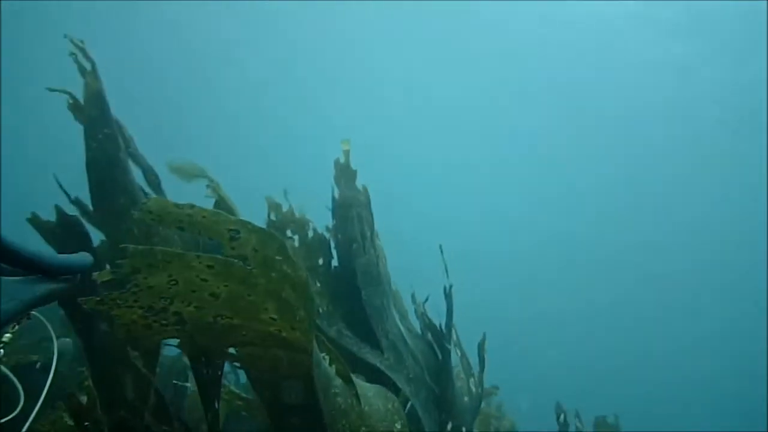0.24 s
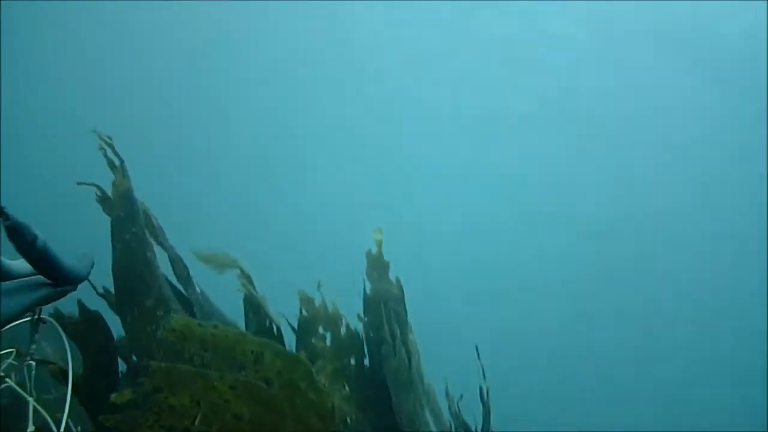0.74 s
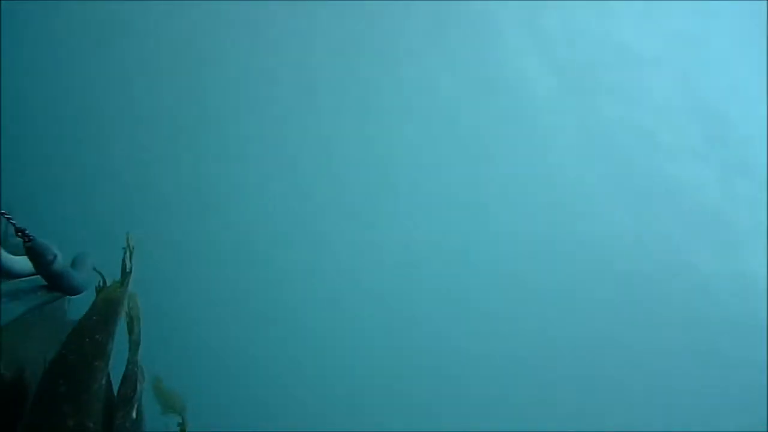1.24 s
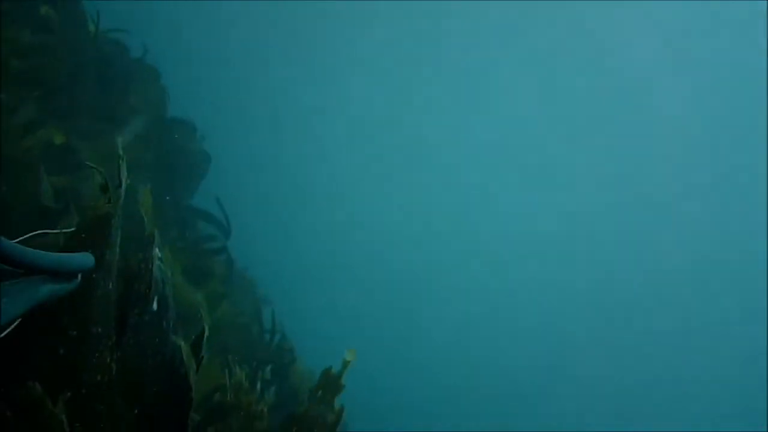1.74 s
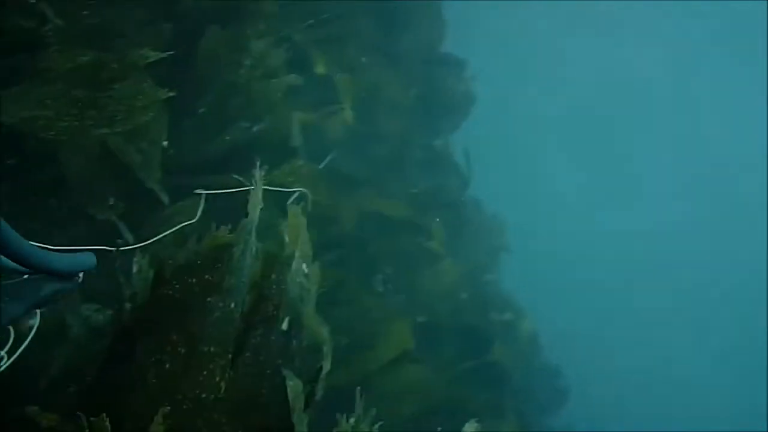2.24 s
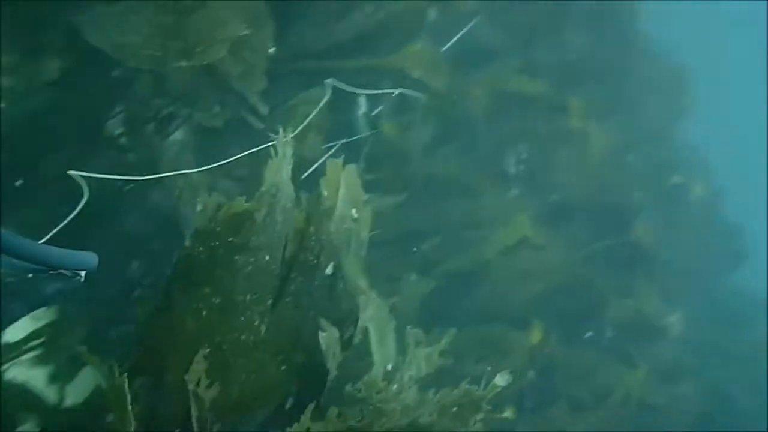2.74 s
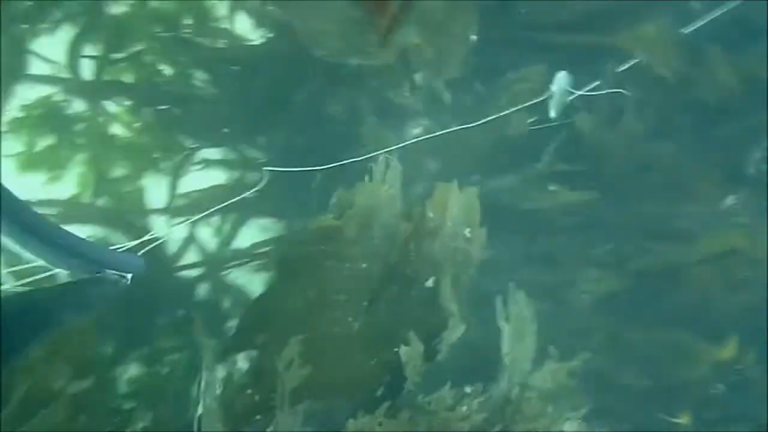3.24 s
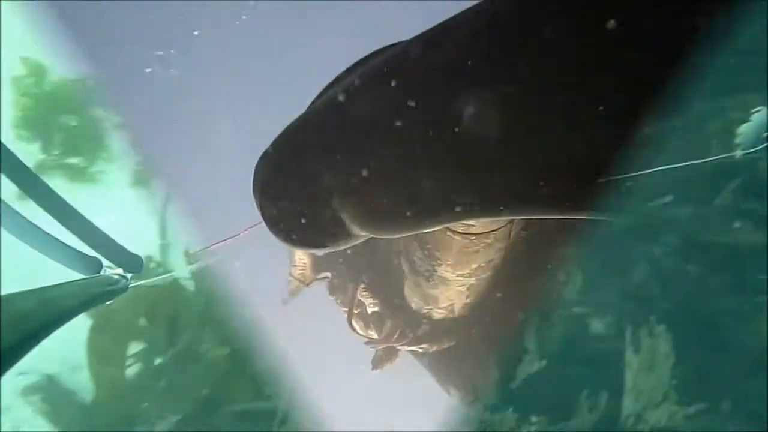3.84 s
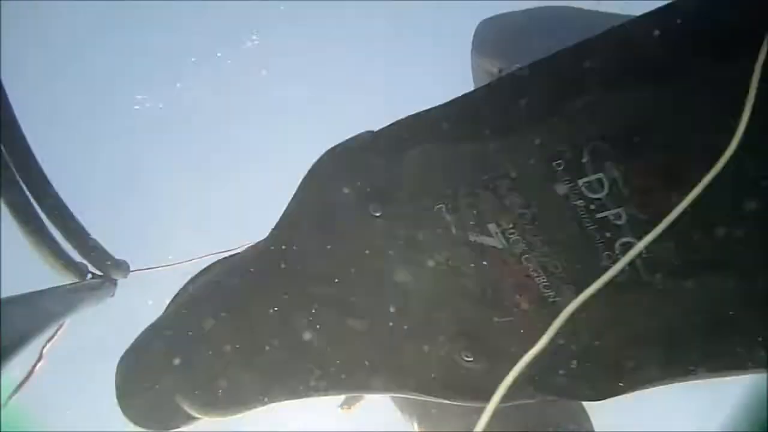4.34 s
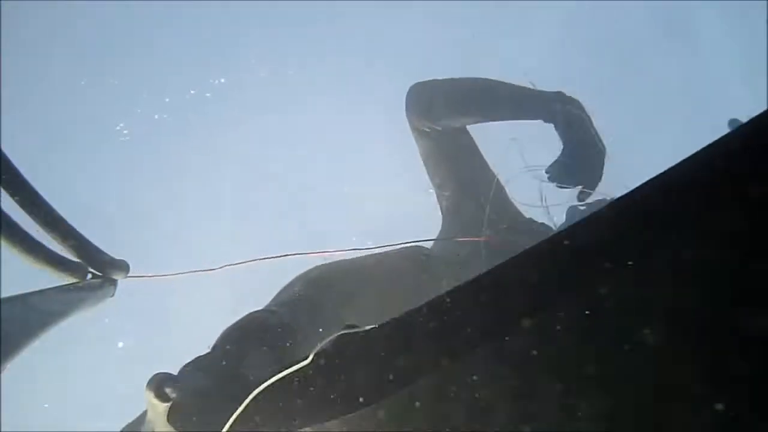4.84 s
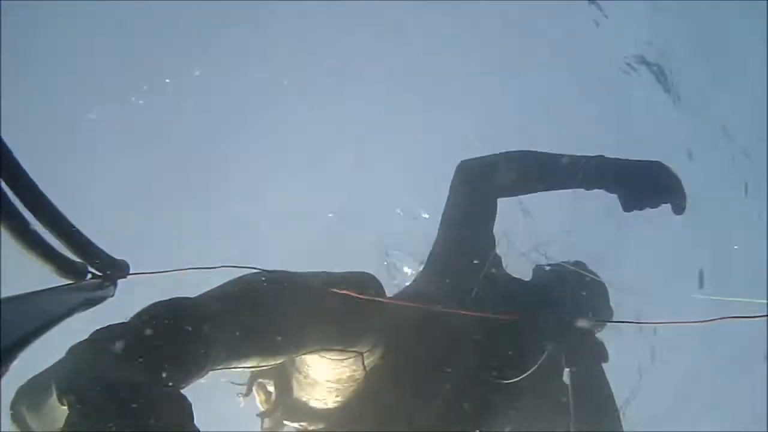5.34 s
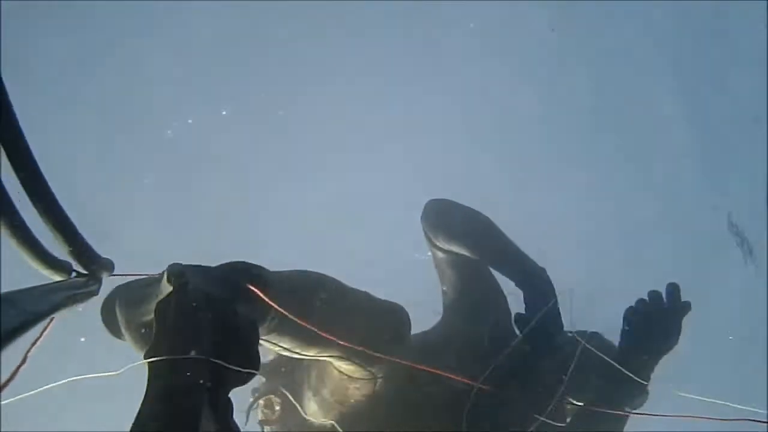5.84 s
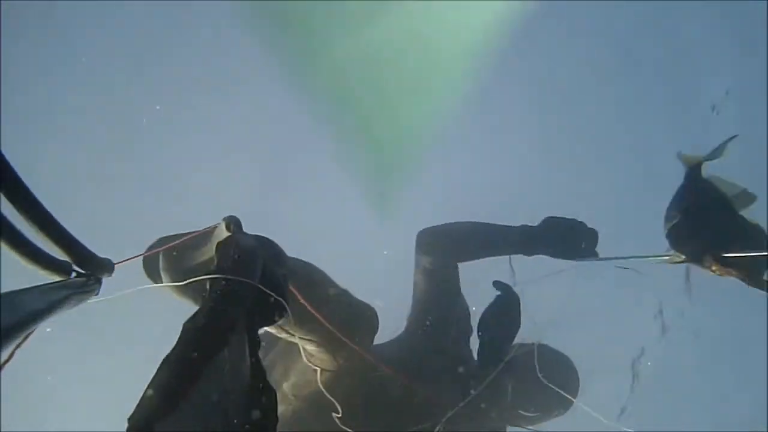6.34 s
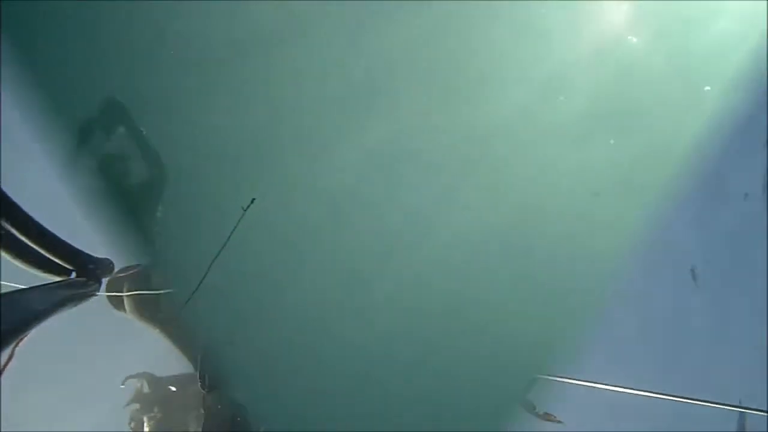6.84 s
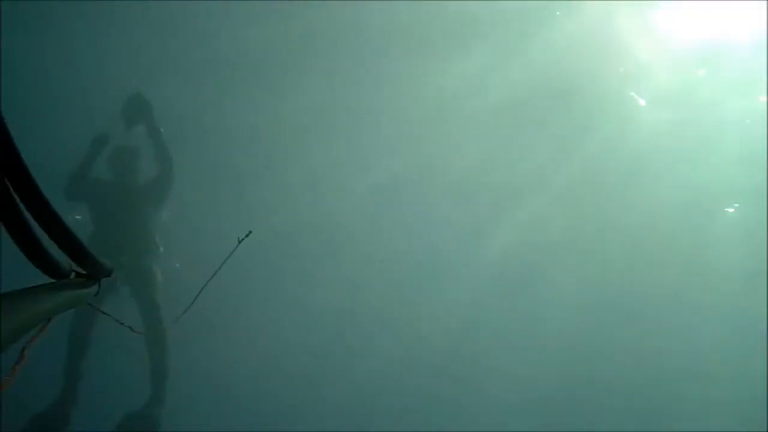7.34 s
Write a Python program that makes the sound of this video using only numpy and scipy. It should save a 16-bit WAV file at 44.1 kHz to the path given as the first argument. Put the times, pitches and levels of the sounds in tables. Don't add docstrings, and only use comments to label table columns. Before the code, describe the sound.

Hard gear bumps and snaps dully against a barrel underwater, heard close through a sealed case, over constant hiss, with faint taps and a dragging cord.

```python
import sys
import numpy as np
from scipy import signal
from scipy.fft import rfft, irfft
from scipy.io import wavfile
from scipy.ndimage import uniform_filter1d

SR = 44100
rng = np.random.default_rng(int(sys.argv[2]) if len(sys.argv) > 2 else 0)


def digitize_waveform(pressure):
    field = np.atleast_2d(pressure).T
    bounded = np.clip(field, -1, 1)
    quanta = np.round(bounded * 32767).astype(np.int16)
    wavfile.write(sys.argv[1], SR, quanta)


def invert_db(level):
    return 10 ** (np.asarray(level, dtype=float) / 20)


N = 334233
LAG = 44

# (frequency [Hz], level [dB], t60 [s])
TAP_MODES = [
    [(161, 0, 0.033)],
    [(243.8, 0, 0.12)],
    [(430, -0.5, 0.037), (574, -0.74, 0.069)],
    [(1036, 1.5, 0.031), (1410, 5, 0.0067)],
]


def evened(x):
    return x / np.sqrt(np.mean(x ** 2) + 1e-20)


def along(rows):
    s, value = np.transpose(rows)
    return np.interp(np.arange(N) / SR, s, value)


def gate(start_s, end_s):
    t = np.arange(N) / SR
    return (t > start_s) & (t < end_s)


def add(mix, at, sound):
    part = mix[at:][:len(sound)]
    part += sound[:len(part)]


def ring(modes, rise_turns=0.43):
    t = np.arange(SR // 2) / SR
    x = np.zeros(len(t))
    for k, (hz, db, t60) in enumerate(modes):
        swell = 1 - np.exp(-t * hz / rise_turns)
        x += (-1) ** k * invert_db(db - 60 * t / t60) * np.sin(2 * np.pi * hz * t) * swell
    return x / abs(x).max()


def knocks(rows, modes, trim_db, rise_turns):
    shapes = np.array([ring(part, rise_turns) for part in modes])
    out = np.zeros(N)
    for s, blow_db, barrel_db, mount_db in rows:
        part_db = blow_db + np.add([0, barrel_db, 0, mount_db], trim_db)
        add(out, round(s * SR) + LAG, -invert_db(part_db) @ shapes)
    return out


def nudge():
    # (time [s], blow on the case [dB], reach into the barrel [dB], reach into the mount [dB])
    nudge_blows = [(1.158, -37.5, 5, 7), (1.184, -28, -6, -4), (1.192, -20.5, -25, -15), (1.2, -39, 7, -7),
                   (1.274, -43.5, 14, 15), (1.2915, -45, 2, 19), (1.3062, -33.5, -9, 10.5),
                   (1.317, -24.5, -9, -12), (1.345, -43.5, 15.5, 6)]
    # (frequency [Hz], level [dB], t60 [s])
    nudge_modes = [
        [(152, 3, 0.025)],
        [(254.6, 0, 0.09)],
        [(407, 2.5, .01), (550, -6, 0.055)],
        [(1010, 8, 0.0065), (1550, 11, 0.019), (2090, -11, 0.0041)],
    ]
    return knocks(nudge_blows, nudge_modes, trim_db=[-28, -5.5, -6.5, -6.5], rise_turns=0.42)


def snap():
    # (time [s], blow on the case [dB], reach into the barrel [dB], reach into the mount [dB])
    snap_blows = [(2.035, -30, -8, -7), (2.0408, -35, -11, 13), (2.0464, -21.5, -17, 15.5),
                  (2.0488, -24, -18, 12.5), (2.0507, -14.5, -16, 7), (2.0624, -9.5, -20, 2.5),
                  (2.0657, -18, -19, -4), (2.071, -23.5, -5, -30)]
    # (frequency [Hz], level [dB], t60 [s])
    snap_modes = [
        [(54.6, -12, .15), (151, 15, 0.086)],
        [(248, 0, 0.042)],
        [(391, -3.5, 0.016), (670, 7, 0.007)],
        [(1330, 20, 0.006), (2240, -26, .004), (1110, -21, 0.019)],
    ]
    return knocks(snap_blows, snap_modes, trim_db=[-15, -1.0, 2.1, 0.2], rise_turns=0.39)


def clack():
    # (time [s], blow on the case [dB], reach into the barrel [dB], reach into the mount [dB])
    clack_blows = [(3.186, -20, -4, -3.5), (3.216, -13.5, -14, -10), (3.2285, -14.5, -19, -11),
                   (3.2328, -10, -1, -2.5), (3.2352, -20, 8, 15.5)]
    # (frequency [Hz], level [dB], t60 [s])
    clack_modes = [
        [(85.7, 8, 0.93), (148, 0, 0.014)],
        [(273, 0, 0.049)],
        [(375, 0.5, 0.037), (529, -3.5, 0.072), (698, 1.5, 0.037)],
        [(1000, -3, 0.014), (1460, 3, 0.014), (1830, 5, 0.0085), (2520, -10, 0.0033)],
    ]
    return knocks(clack_blows, clack_modes, trim_db=[-31, -14.0, -1.5, -3.5], rise_turns=0.33)


def tumble():
    # (time [s], blow on the case [dB], reach into the barrel [dB], reach into the mount [dB])
    tumble_blows = [(5.598, -23, -15, -22), (5.6035, -11, -20, -24), (5.611, -16, -11, -15),
                    (5.617, -30, 6, 3), (5.624, -10.5, -21, -29), (5.6286, -7, 2, 2),
                    (5.635, -14.5, -9, -18), (5.645, -18.5, -7, -18), (5.654, -12, -7, -24),
                    (5.665, -16, -16, -9), (5.671, -9, -3, -44), (5.679, -14, -1.5, -11.5),
                    (5.695, -23, 9.5, -13), (5.703, -34, 1, -6), (5.711, -18.5, -23, -36),
                    (5.723, -31, -11, -26)]
    # (frequency [Hz], level [dB], t60 [s])
    tumble_modes = [
        [(87.8, -17, 0.95), (65.6, -11.5, 0.4), (174, 7, 0.039)],
        [(286, 0, 0.043)],
        [(386, 12, 0.057), (517, -3, 0.068), (693, 3, 0.022)],
        [(993, 18, 0.012), (1450, -12, 0.0061), (1930, -25, 0.0046)],
    ]
    return knocks(tumble_blows, tumble_modes, trim_db=[-12.5, -6.5, -1.7, -0.6], rise_turns=0.45)


def cracks():
    # (time [s], peak [dB], sharpness above the lowest mode [dB per octave])
    crack_rows = [(1.1925, -48, 10), (1.279, -43, 3), (2.035, -28, 0), (2.0412, -13, 3), (2.0461, -10, -7),
                  (2.0485, -8.5, -0.5), (2.0621, -22.5, 0), (3.186, -40, -8), (3.2341, -26, 1.5),
                  (5.603, -33, -9), (5.617, -28, -5), (5.628, -28.5, 12), (5.664, -50, -6)]
    # (frequency [Hz], level [dB], t60 [s])
    crack_modes = [(2560, 9, 0.0023), (3790, 1.5, 0.0031), (4860, 5, 0.0017), (7200, -23, 0.017),
                   (9020, -8.5, 0.0039), (12300, -24.5, 0.0038)]
    lowest_hz = crack_modes[0][0]
    out = np.zeros(N)
    for s, peak_db, sharp_db in crack_rows:
        modes = [(hz, db + sharp_db * np.log2(hz / lowest_hz), t60) for hz, db, t60 in crack_modes]
        add(out, round(s * SR) + LAG, -invert_db(peak_db) * ring(modes))
    return out


def shoves():
    # (time [s], peak [dB], contact [ms])
    press_rows = [(1.194, -13.5, 1.62), (1.220, -29, 36), (1.885, -41, 6.7), (1.1853, -23, 1.65),
                  (2.0471, 1, 1.35), (2.0513, 0, 1.4), (2.0634, -5, 0.74), (3.2302, -14, 1.5),
                  (2.075, -28.5, 56), (5.620, -14, 5.4), (5.625, -7, 3.7), (5.636, -6.5, 5.5),
                  (5.6659, -4, 1.87)]
    # (time [s], peak [dB], contact [ms])
    release_rows = [(1.186, -19.5, 1.24), (1.1932, -10, 1), (1.1967, -23, 2.1), (1.202, -35, 18),
                    (2.0484, -2, 4.65), (2.064, -11, 4.4), (3.2181, -15.5, 0.96), (3.231, -11, 0.69),
                    (3.235, -13, 1.63), (5.611, -16, 12), (5.6294, 4.5, 1.77), (5.66, -12, 6.4)]
    out = np.zeros(N)
    t_ms = np.arange(SR // 10) / SR / 1e-3
    for way, rows in ((-1.01, press_rows), (0.99, release_rows)):
        for s, db, ms in rows:
            done = np.minimum(t_ms / ms, 1) ** (1 / (1 + ms / 30))
            add(out, round(s * SR), way * invert_db(db) * abs(np.sin(np.pi * done)) ** 1.74)
    return out


def taps():
    # (time [s], blow on the case [dB], reach into the barrel [dB], reach into the mount [dB])
    tap_blows = [(1.152, -53, 14, -3), (1.28, -49, 15, 5), (1.358, -47, 10.5, -12), (1.516, -47.5, -3, 4),
                 (1.698, -60, 13, 1.5), (2.311, -45.5, -12, -1), (3.611, -48.5, 3, -3), (3.915, -33, 5, -8),
                 (4.001, -54.5, 11, 1.5), (4.146, -36.5, 0, -8), (4.298, -42.5, -13, -14),
                 (4.317, -31.5, 0, -13), (4.344, -52, 13.5, -3), (4.414, -54, -13, 10),
                 (4.545, -57, -9, 14), (4.59, -47, -12, 2), (4.997, -40.5, 4, -16), (5.275, -47, 4.5, -13),
                 (6.028, -61, 12.5, 1), (6.124, -47, 7.5, -12)]
    return knocks(tap_blows, TAP_MODES, trim_db=[-13, 0.4, 3.5, 0.0], rise_turns=0.54)


def cord_taps():
    # (time [s], blow on the case [dB], reach into the barrel [dB], reach into the mount [dB])
    cord_blows = [(6.437, -40, -4, -0.5), (6.445, -35.5, -18, -11), (6.464, -41, 5.5, -8),
                  (6.543, -33.5, -25, 6.5), (6.625, -40, -25, -11), (6.737, -49, 3, 9),
                  (6.897, -46.5, 3, -4), (6.972, -42.5, -15, 11), (6.996, -39.5, -28, -4),
                  (7.049, -45.5, -26, 0), (7.321, -50, -13, -4), (7.333, -43, 5, -11)]
    # (frequency [Hz], level [dB], t60 [s])
    cord_modes = [
        [(156, 0, 0.047)],
        [(247, 0, 0.13)],
        [(424.5, 5.5, 0.082), (558, 1.5, 0.07)],
        [(1020, -8, 0.022), (1816, 3, 0.017)],
    ]
    return knocks(cord_blows, cord_modes, trim_db=[-17, -1.7, 1.5, 0.3], rise_turns=1.2)


def rubbing(level, modes, per_s, spread_db):
    when = rng.random(N) < per_s / SR
    way = rng.choice([-1, 1], N)
    size_db = spread_db * np.minimum(rng.exponential(1, N), 4)
    slips = when * way * invert_db(size_db)
    return level * evened(signal.oaconvolve(slips, ring(modes))[:N])


def scrape():
    # (start [s], hardest [s], end [s], level [dB])
    stroke_rows = [
        (1.14, 1.18, 1.35, -44),
        (1.213, 1.272, 1.3, -46),
        (1.29, 1.322, 1.377, -38),
        (5.597, 5.603, 5.74, -32.5),
    ]
    # (frequency [Hz], level [dB], t60 [s])
    scrape_modes = [(548, -1, 0.097), (904, -6.5, 0.048), (1240, 0.5, 0.016), (1635, -4.5, 0.014),
                    (2060, -3.5, 0.0058)]
    ends_db = -38
    strokes = np.zeros(N)
    for start, hardest, end, db in stroke_rows:
        away = along([(start, 1), (hardest, 0), (end, 1)])
        strokes += invert_db(db + ends_db * away ** 1.27) * gate(start, end)
    return rubbing(strokes, scrape_modes, per_s=1500, spread_db=1.5)


def cord_drag():
    # (time [s], level [dB])
    drag_curve = [(6.58, -62), (6.87, -45), (6.96, -54), (7.2, -57.5), (7.31, -54), (7.49, -60.5),
                  (7.52, -74)]
    # (frequency [Hz], level [dB], t60 [s])
    drag_modes = [(1763, 5, 0.019), (1910, 3.5, 0.018), (2066, -2.5, 0.022)]
    rub = invert_db(along(drag_curve)) * gate(drag_curve[0][0], drag_curve[-1][0])
    return rubbing(rub, drag_modes, per_s=900, spread_db=2.0)


def water():
    # (time [s], level [dB])
    surge_curve = [(0.0, -66), (0.4, -61), (1.9, -59), (2.2, -54), (2.5, -58.5), (3.2, -50.5), (4.03, -44),
                   (4.4, -58), (4.55, -52), (4.8, -60), (5.6, -55), (6.1, -65), (6.5, -55), (7.2, -60),
                   (7.47, -43.5), (7.58, -61)]
    # (frequency [Hz], level [dB], t60 [s])
    sway_modes = [(82.6, 0, 0.8), (64, -13, 0.17)]
    surge_db = along(surge_curve)
    brush = rubbing(invert_db(surge_db - 14.5), [*TAP_MODES[1], *TAP_MODES[2]], per_s=170, spread_db=10.5)
    sway_db = -71 + 0.74 * (surge_db + 60)
    return brush + rubbing(invert_db(sway_db), sway_modes, per_s=60, spread_db=4)


def hiss():
    # (frequency [Hz], level per Hz [dB])
    hiss_curve = [(8.8, -27), (15, -0.5), (43, -5), (59, -6), (81, -6.5), (218, -9), (299, -9.5),
                  (536, -11.5), (828, -15), (1140, -16), (1280, -17.5), (1920, -19), (3650, -23),
                  (13900, -27.5), (15600, -30)]
    hiss_db, edge_hz = -52, 15800
    hz = np.fft.rfftfreq(N, 1 / SR)
    f, db = np.transpose(hiss_curve)
    colour = invert_db(np.interp(np.log(hz + 1), np.log(f + 1), db)) * (hz < edge_hz)
    drift = evened(uniform_filter1d(rng.standard_normal(N), 9000))
    noise = irfft(rfft(rng.standard_normal(N)) * colour, N)
    return invert_db(hiss_db + 0.21 * drift) * evened(noise)


def scene():
    gear = nudge() + snap() + clack() + tumble() + cracks() + shoves() + scrape()
    light = taps() + cord_taps() + cord_drag()
    return (gear + light + water())[None]


def band_limit(x):
    return signal.sosfilt(signal.butter(12, 16500, fs=SR, output="sos"), x)


def record(dry):
    # (start [s], end [s], fade-out [s])
    overlap_rows = [
        (3.144, 4.62, .05),
        (6.02, 7.56, .1),
    ]
    fade_in_s = 0.032
    share = np.zeros(N)
    for a, b, fade in overlap_rows:
        share += along([(a, 0), (a + fade_in_s, 1), (b - fade, 1), (b, 0)])
    duck_s, duck_db, onset_s, recovery_s = 1.92, -1.6, 0.1, 1.55
    t = np.arange(N) / SR
    after = np.maximum(t - duck_s, 0)
    gain_db = duck_db * (1 - np.exp(-after / onset_s)) * np.exp(-after / recovery_s)
    hum = invert_db(-81.0) * np.sin(2 * np.pi * 30 * t)
    offset = -0.00105
    floor = hiss() * invert_db(gain_db) * np.sqrt(1 + 1.02 * share) + (hum + offset) * (1 + share)
    return band_limit(np.clip(dry + floor, -1, 1))


dry = scene()
out = record(dry)
digitize_waveform(out)
```